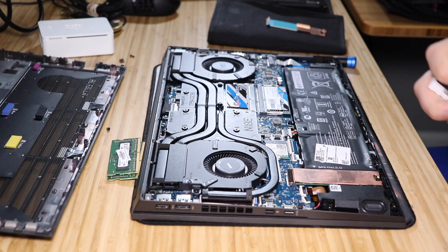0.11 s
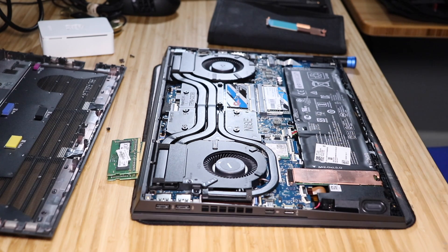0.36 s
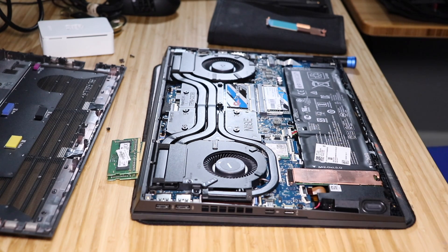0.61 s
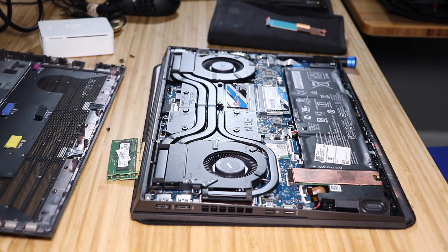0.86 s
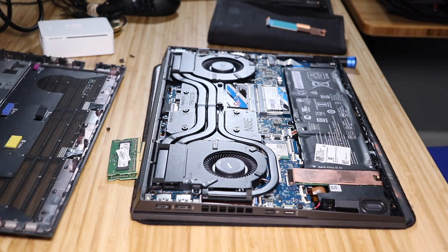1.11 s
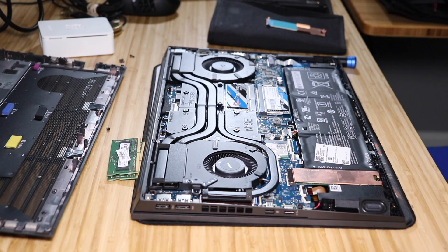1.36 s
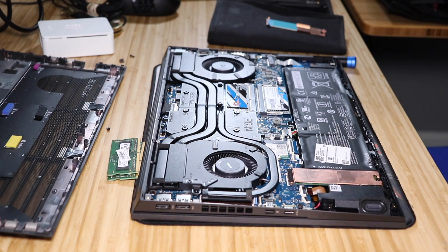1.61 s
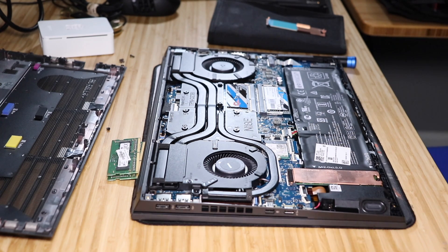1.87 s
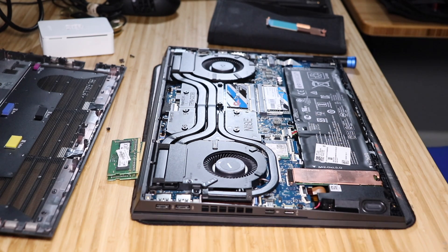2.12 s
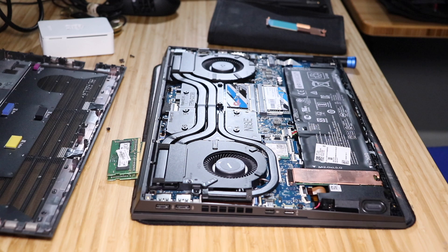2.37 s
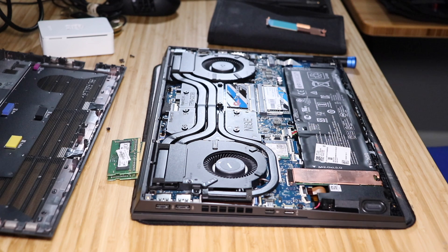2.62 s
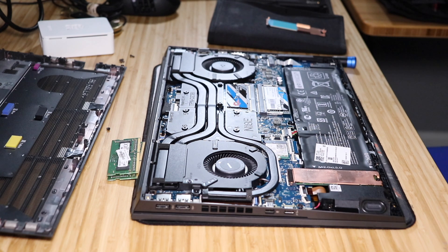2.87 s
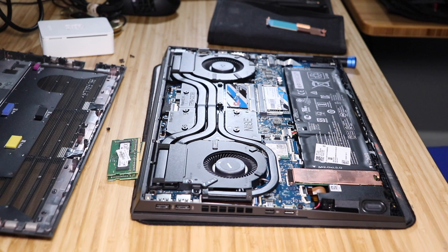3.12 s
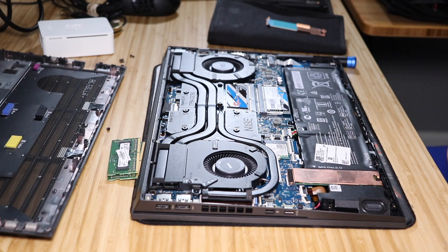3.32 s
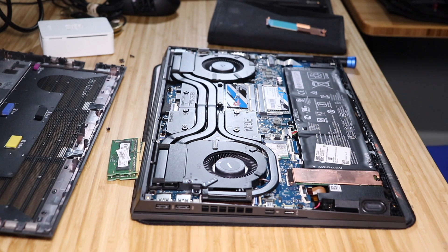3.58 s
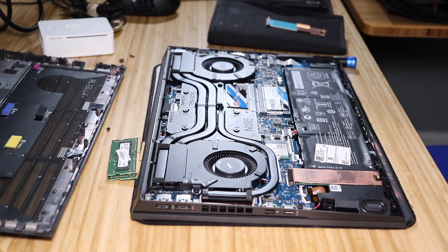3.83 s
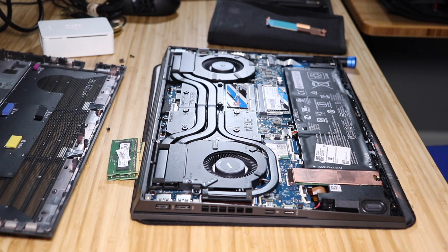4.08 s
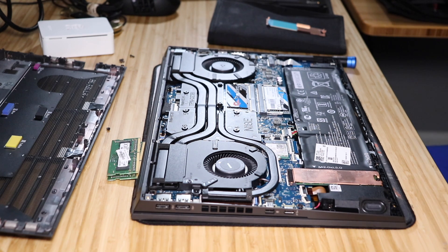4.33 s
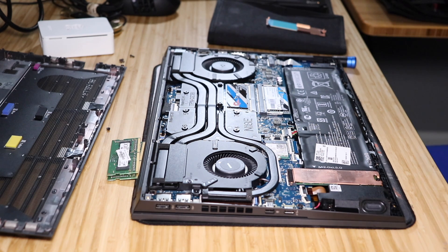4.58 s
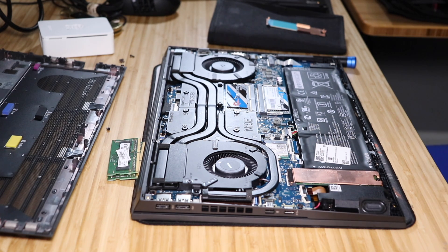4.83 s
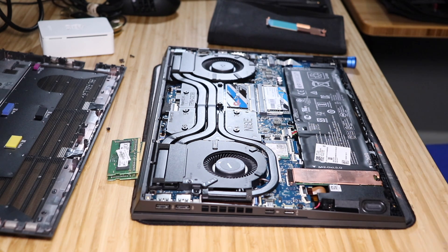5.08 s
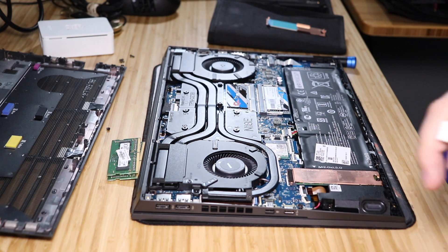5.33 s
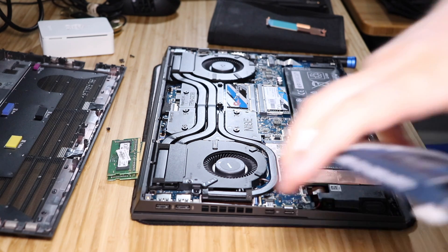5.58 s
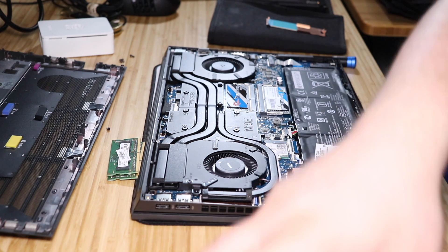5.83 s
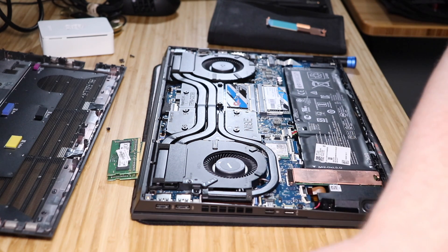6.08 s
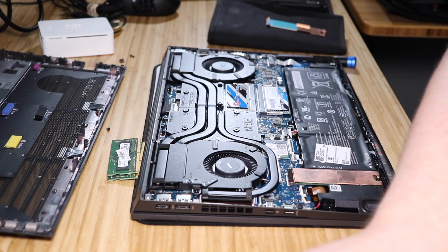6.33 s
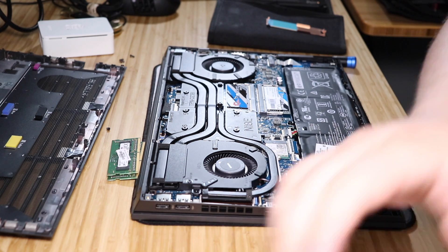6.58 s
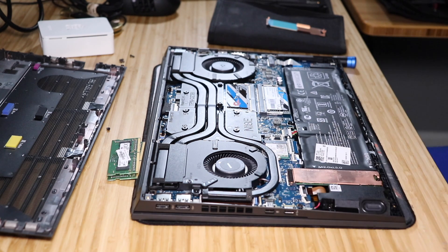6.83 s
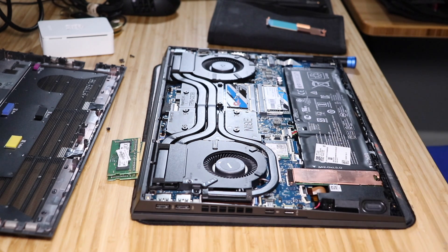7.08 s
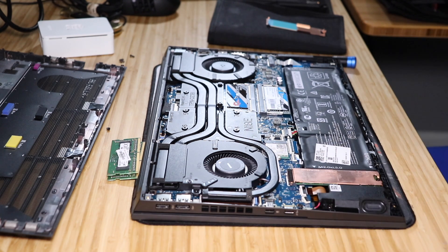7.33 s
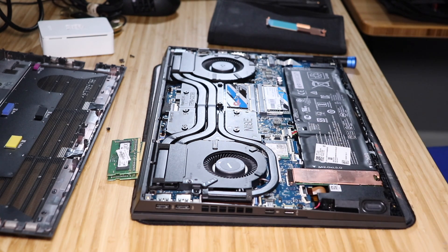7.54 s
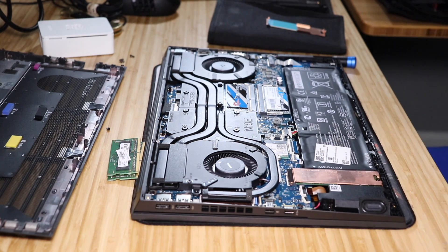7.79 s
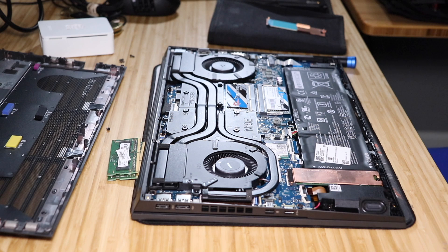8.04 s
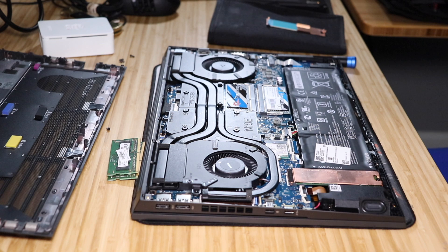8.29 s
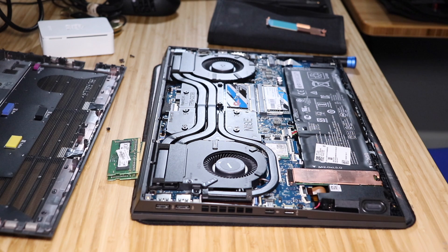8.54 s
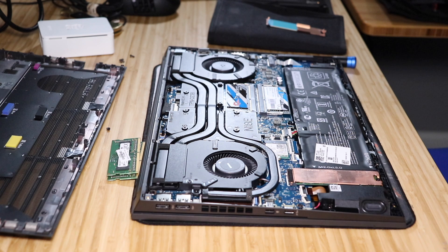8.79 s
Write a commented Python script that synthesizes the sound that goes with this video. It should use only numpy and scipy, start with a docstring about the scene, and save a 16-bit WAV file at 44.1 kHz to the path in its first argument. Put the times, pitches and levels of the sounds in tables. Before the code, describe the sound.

Stiff hollow plastic packaging rustles, crackles and snaps in someone's hands in a quiet room, with a few sharp loud cracks and short peels.

```python
"""In a quiet room, hands bend, tear and peel open a stiff hollow plastic pack over a wooden desk.
Fingers and film rustle: a swarm of tiny noise slips, coloured by the ringing hollow of the pack.
Creases snap in short ragged bursts that ring the crease, the hollow and the walls, and jolt the desk.
Small creases crackle at uneven gaps, and film comes off its glue in quick runs of slips.
A short room tail follows the pack, over steady air noise with a faint wavering hum."""
import sys
import numpy as np
from scipy import signal
from scipy.fft import rfft, irfft
from scipy.io import wavfile
from scipy.ndimage import uniform_filter1d

SR = 44100
rng = np.random.default_rng(int(sys.argv[2]) if len(sys.argv) > 2 else 0)


def waveform_to_disk(signal):
    """Save audio, clipped to [-1, 1], as 16-bit WAV at the path in sys.argv[1]."""
    frames = np.transpose(np.atleast_2d(signal))
    scaled = np.clip(frames, -1, 1) * 32767
    samples = np.round(scaled).astype(np.int16)
    wavfile.write(sys.argv[1], SR, samples)


def nominal_scale(level):
    """Amplitude ratio for a level in decibels (scalar or array-like)."""
    x = np.asarray(level, float) / 20
    return 10 ** x


N = 393372  # length in samples

# Squeezes, slides and pulls of the hands. Each row: time of the top in seconds, level in dB against the
# other moves, seconds to swell by 20 dB, seconds to fade by 20 dB (anything under 0.01 acts as 0.01).
MOVES = [(0, -58, .1, 0.38), (0.749, -66, 0.26, 0.7), (1.25, -62.5, 0.33, 0.23), (1.38, -66, -0.2, 1.9),
         (1.62, -66, 0.35, .15), (1.866, -56, 0.03, 0.13), (1.965, -62.5, -0.21, 0.7),
         (2.08, -52.5, -0.05, 0.35), (2.351, -51.5, -0.1, 0.19), (2.572, -61.5, .5, 0.13),
         (2.844, -63, 0.27, 0.14), (2.955, -64.5, -0.03, 0.32), (3.024, -53.5, -0.04, 0.11),
         (3.055, -52.5, -0.02, 0.07), (3.257, -60.5, -0.02, 0.12), (3.415, -60, -0.05, 0.1),
         (3.47, -61, 0.05, .2), (3.545, -49.5, -0.0149, 0.31), (3.8, -50.5, 0.08, 0.33),
         (4.005, -56.5, -0.2, 0.3), (4.205, -60.5, -0.66, .25), (4.385, -60, 0.1, 0.2),
         (4.529, -61, 0.05, 0.7), (4.72, -55, .03, 0.2), (4.795, -44.5, .083, 0.24),
         (4.94, -63, 0.05, 0.65), (5.095, -48.5, 0.14, 0.11), (5.173, -46.5, -0.03, 0.1148),
         (5.235, -50.5, -0.07, 0.16), (5.284, -49.5, 0.09, 0.04), (5.369, -47.5, -0.06, 0.05),
         (5.475, -50, 0.05, .07), (5.549, -57, -0.4, 0.03), (5.75, -54.5, 0.04, 0.26),
         (5.8, -58.5, 0.13, 0.03), (5.915, -53.5, .01, 0.33), (5.99, -50.5, 0.11, 0.1),
         (6.06, -61, 0.05, 0.19), (6.2, -57, 0.24, .1), (6.372, -65, .1, .07), (6.892, -62.5, 0.18, 0),
         (7.162, -70, 0.54, 1), (7.54, -65.5, .83, 0.6), (8.235, -67.5, 0.4, 0.9), (8.745, -49, -0.02, 0.3),
         (8.804, -41.5, 0.01, 0.04)]
# The part in the hands, thick shell or thin film. Each row: time in seconds, boom in dB, edge in dB,
# both as starting points that the rustle and the crackle shift further.
GRIP = [(0, -1, -18.5), (.55, -8, -7), (.9, 4, -9.5), (1.3, 2, -6), (2.1, -0.5, -10.5), (2.4, 1.5, -8.5),
        (2.9, 6.5, 0.5), (3.25, 3.5, -9.5), (3.5, 3, -15), (4, -2, -5), (4.8, 1.5, -8), (5.1, -12.5, -11.5),
        (5.45, -6.5, -13), (5.8, -2, -9.5), (6.4, 0.5, -12), (6.9, -4, -9.5), (7.5, -10, -6),
        (8.3, -9, -1.5), (8.92, -8, -4)]
# The hollow as the grip changes it. Each row: time in seconds, base pitch of the first air resonance in Hz,
# base pitch of the second in Hz, extra strength of the resonances in dB.
HOLLOW = [(0, 885, 2150, 0), (.55, 960, 2920, -3), (.74, 930, 2500, -1), (1.701, 920, 2640, 3),
          (2.1, 980, 3060, -1.5), (2.25, 1111, 3360, -7), (2.701, 1040, 2700, -1.5),
          (3.04, 800, 2760, -0.5), (3.2, 980, 2780, -4.5), (3.45, 1027, 3850, 4), (3.75, 1090, 3720, -1.5),
          (4.2, 1070, 2985, -4.5), (5.2, 1177, 3050, -3.5), (6.3, 943, 2864, -5.5), (7.2, 1096, 3447, -10),
          (8.92, 1098, 3290, -4)]
# Resonances of the hollow. Each row: share of the first base pitch, share of the second (both plain
# numbers), width in Hz, level in dB before the extra strength.
HOLLOW_MODES = [(1.05, 0, 190, 7), (0.98, 1, 220, -3), (0.037, 1, 370, 3), (0, 1.95, 700, 1),
                (0.049, 2.5, 1800, -2.5)]
# How the room tail dies away. Each row: pitch in Hz, seconds to fall by 60 dB.
ROOM_DECAY = [(200, 0.27), (600, 0.27), (1500, 0.31), (4000, 0.39), (10000, 0.21)]
# Colour of the room tail against the direct sound. Each row: pitch in Hz, gain in dB.
ROOM_COLOUR = [(1300, -0.5), (1900, 2.5), (2800, -2), (4000, -2), (7000, 1.5)]
# Colour of the air noise. Each row: pitch in Hz, relative level in dB per Hz.
AIR_COLOUR = [(24, -36), (40, -11), (127, 0.5), (438, -6), (640, -7.5), (1110, -13.5), (2100, -17),
              (2760, -20.5), (4920, -27.5), (11900, -31), (16500, -54)]
# Faint hum tones. Each row: pitch in Hz, level in dB before a shared cut of 1 dB.
HUM = [(118.4, -82.5), (150.7, -80)]
# Creases and seams that give way. Each row: time in seconds, peak of the dry crack in dB, boom of the shell
# in dB, edge of the crack in dB, ring of the crease in Hz.
SNAPS = [(0.1443, -46, -8, -11, 3440), (0.235, -44, 2, -15, 3600), (0.2924, -40, 0, -9, 2780),
         (0.3873, -43, 4, -4.5, 3920), (0.514, -43, -10, -8, 4800), (0.5232, -24.5, 3.5, -2, 2960),
         (0.586, -44.5, 31, -14, 1500), (0.7394, -44, 27, -14, 2930), (0.98, -39.5, -1, -10, 2490),
         (1.027, -38.5, 7, -15, 2500), (1.06, -41.5, -4, -9, 2710), (1.099, -42, 11, -1, 3140),
         (1.124, -43, -4, -7, 2560), (1.171, -43.5, -8, -10, 2580), (1.198, -44, 3, -9, 2330),
         (1.304, -43, 3, -8, 2690), (1.365, -38, 6.5, -2, 2630), (1.373, -39.5, 12, -20, 2450),
         (1.4123, -41.5, -1, 0, 2590), (1.602, -35, 5.5, -2.5, 7040), (1.6308, -35.5, -0.5, -3, 4780),
         (1.7621, -36, 0.5, -6.5, 2970), (1.8582, -34.5, -6, -11.5, 3190), (1.935, -40, 2, -27, 1500),
         (2.0154, -35, 11, -9.5, 1490), (2.069, -32, 10.5, 2.5, 6700), (2.152, -34.5, -9, -1.5, 3300),
         (2.192, -30, -2.5, -11.5, 5150), (2.2013, -32, -0.5, -18, 2820), (2.2403, -27, 11, 5.5, 1510),
         (2.2524, -9.5, 11.5, -10, 1740), (2.2535, -2.5, 5.5, -0.5, 3500), (2.4337, -29.5, 2, -0.5, 5900),
         (2.5765, -39, 5, -17, 2660), (2.6282, -39, -6, -5, 2800), (2.6813, -40.5, 3.5, -7.5, 2600),
         (2.828, -39.5, 5, -5, 2900), (2.851, -41, 17.5, -1, 2896), (2.884, -41.5, 0, 1, 2020),
         (2.9026, -38.5, -2, -4.5, 4500), (2.949, -37.5, 14, 0, 2900), (3.023, -35.5, 20, -2, 2900),
         (3.044, -34, 20, -21, 2900), (3.059, -27.5, 6.5, -35, 2850), (3.149, -46.5, 0, -6, 2840),
         (3.201, -47, 7, -6, 3940), (3.239, -44, 6, -6, 4030), (3.256, -44.5, 10, -9, 3980),
         (3.416, -40, 11.5, -9.5, 3840), (3.445, -47, 3, -8, 1710), (3.467, -34.5, 0.5, -20, 4030),
         (3.5626, -8, -6, -13.5, 3870), (3.5662, -9.5, -1.5, -13, 3780), (3.662, -46.5, 7, -15, 3900),
         (3.719, -34.5, 3, -12, 4000), (3.75, -40, 6, -5, 3800), (3.8163, -12, 8.5, -6, 2190),
         (3.838, -28, -5, -6, 7500), (4.002, -32.5, -0.5, -9, 3840), (4.3852, -39.5, 2, -10, 2950),
         (4.6283, -35, 5.5, -10, 3110), (4.7869, -24, 8.5, -12, 1290), (4.7931, -29, 13, -19, 2800),
         (4.994, -39.5, -7, -5.5, 4480), (5.114, -37.5, 1, -10, 3000), (5.172, -39, 5, -18, 3200),
         (5.233, -40, -4, -10, 2900), (5.293, -38.5, -10, -6.5, 3500), (5.362, -39.5, 6, -11, 3500),
         (5.4252, -40, 31, -19, 1508), (5.46, -33.5, -13, -2.5, 7800), (5.476, -39.5, -12, -7, 5000),
         (5.4921, -36, 6.5, -17, 2720), (5.55, -37.5, 10, -13, 3150), (5.6647, -44.5, -8, -8, 3350),
         (5.746, -40, 3, -9, 4300), (5.789, -34, -1, -23.5, 2690), (5.874, -42, 7, -11, 4600),
         (5.911, -43, 21, -10, 2500), (5.9897, -31, 2.5, -16.5, 3000), (6.01, -37, 11, -16, 2500),
         (6.059, -42, 15.5, -17, 3100), (6.288, -44, -3, -7, 3000), (6.3637, -44, 6.5, -16, 1554),
         (6.628, -48.5, -5, -7.5, 3000), (6.8882, -40.5, -9, -16.5, 2455), (6.896, -36.5, 3, -10, 2250),
         (6.922, -39.5, -5.5, -4, 5240), (7.2333, -41.5, -17, -7.5, 4950), (7.2756, -36.5, -3, -5, 3900),
         (7.3661, -44, -12.5, -8.5, 3365), (7.3918, -43, -17, -7.5, 3400), (7.405, -33.5, -16, -12, 3410),
         (7.566, -36.5, -6, -4, 6930), (7.5846, -38, -14, -7, 3500), (7.609, -34.5, -20, -9.5, 3540),
         (7.6568, -39, -4.5, 1.5, 7900), (7.67, -35.5, -6, -10, 6420), (7.776, -46, -2.5, -3.5, 7100),
         (7.8078, -46, -6, 0.5, 4970), (7.8612, -45, -7, -6.5, 3090), (7.908, -41.5, -8, -4.5, 3060),
         (7.978, -40.5, -9.5, 1, 3250), (7.9975, -40, -4, -0.5, 3240), (8.0224, -38, 6, -4, 3230),
         (8.0512, -36, 1, -2.5, 1510), (8.093, -43, -13, -2, 5800), (8.1049, -41, 4, 2, 8350),
         (8.161, -44.5, -8, -2, 5000), (8.181, -40, -8, -2, 5860), (8.1992, -39.5, -7.5, -3, 6000),
         (8.308, -40.5, -13, 4, 6600), (8.3527, -35, -16, 1, 6120), (8.383, -36, -4, 0.5, 6700),
         (8.5052, -29.5, -8, -5.5, 3390), (8.558, -39, -9, -8.5, 3880), (8.6404, -32.5, -6.5, -10.5, 3660),
         (8.652, -33, -6, -6, 6830), (8.6694, -31, -6.5, -5, 6260), (8.6912, -32, 0, -5, 6940),
         (8.716, -30.5, -7, -9, 3640), (8.732, -32.5, -8, -9, 3450), (8.847, -30, -2, -6, 3480),
         (8.865, -28, -7, -6, 3340), (8.9085, -32, -2.5, -5.5, 3720)]
# Bending modes of the walls, rung by hard blows. Each row: pitch in Hz, width in Hz, level in dB for
# a crack that peaks at 0 dB.
WALL_MODES = [(370, 300, -2), (800, 360, -5), (1090, 260, 2.5), (1740, 260, 5), (2300, 160, -0.5)]
# Spells of small creases. Each row: start in seconds, length in seconds, ticks per second,
# middle peak level in dB.
CRACKLE = [(1.448, .14, 38, -44.5), (1.792, .2, 50, -43.5), (2.029, .15, 70, -44), (2.438, .16, 61, -41.5),
           (3.404, .14, 48.6, -43), (4.189, .06, 55, -44), (4.602, .12, 48, -47), (4.849, .12, 60, -43.5),
           (6.838, .12, 51, -49), (7.28, .37, 40, -45.5), (7.71, .14, 35, -50), (8.578, .06, 70, -44.5)]
# Film coming off its glue. Each row: start in seconds, length in seconds, top slips per second,
# middle peak level in dB at that top.
PEELS = [(1.849, .055, 170, -40), (1.95, .025, 200, -44), (7.447, .109, 160, -37),
         (8.212, .045, 290, -46.5), (8.26, .085, 120, -48), (8.432, .07, 110, -48.5),
         (8.736, .162, 230, -37.5)]

BOOM_HZ, BODY_HZ, EDGE_HZ = 1000, 3200, 9500  # corners between low, middle and high sound


def evened(x):
    """Scales a signal to an rms of one."""
    return x / np.sqrt(np.mean(x ** 2) + 1e-20)


def read(points, hz):
    """Reads a curve of (Hz, value) points along a logarithmic pitch axis."""
    f, value = np.transpose(points)
    return np.interp(np.log(hz + 1), np.log(f + 1), value)


def add(mix, s, sound):
    """Adds a sound to the mix at s seconds."""
    part = mix[round(s * SR):][:len(sound)]
    part += sound[:len(part)]


def shell(hz, t, shift=1):
    """Gain of the pack at time t: the bare crack plus the ringing hollow, summed as powers."""
    s, first, second, strength_db = np.transpose(HOLLOW)
    power = nominal_scale(-5.5) ** 2  # the bare crack
    for a, b, width_hz, db in HOLLOW_MODES:
        centre_hz = shift ** b * np.interp(t, s, a * first + b * second)
        off = 2 * (hz - centre_hz) / width_hz
        mode_gain = nominal_scale(db + np.interp(t, s, strength_db))
        power = power + mode_gain ** 2 / (1 + off ** 2) ** 1.17
    no_bass = 1 + (240 / (hz + 1)) ** 3  # small things radiate no bass
    no_top = 1 + (hz / 14300) ** 8
    return np.sqrt(power) / no_bass / no_top


def tilt(hz, boom_db, edge_db):
    """Gain that bends the spectrum below and above the body band."""
    octave = np.log2(hz + 1)
    low = np.clip((np.log2(BODY_HZ) - octave) / np.log2(BODY_HZ / BOOM_HZ), 0, 1)
    high = np.clip((octave - np.log2(BODY_HZ)) / np.log2(EDGE_HZ / BODY_HZ), 0, 1.5)
    return nominal_scale(low * boom_db + high * edge_db)


def grip(t):
    """Boom and edge of the part that is in the hands at time t."""
    s, boom_db, edge_db = np.transpose(GRIP)
    return np.interp(t, s, boom_db), np.interp(t, s, edge_db)


def hands(t):
    """Gain of the handling: every move swells to its top and fades, and their powers add."""
    top, db, swell, fade = np.transpose(MOVES)[:, :, None]
    before = (top - t) / np.maximum(swell, .01)
    after = (t - top) / np.maximum(fade, .01)
    away = np.maximum(before, after)
    move_gain = nominal_scale(db - 20 * away ** 1.2)  # a power above 1 rounds the top
    return np.sqrt((move_gain ** 2).sum(0))


def rustle():
    """A swarm of tiny slips, in clumps, over a smooth rub; the hands set level and colour."""
    clumps = nominal_scale(2.0 * evened(uniform_filter1d(rng.standard_normal(N), 350)))
    sizes = nominal_scale(2.3 * np.minimum(rng.exponential(1, N), 2.5))
    slips = sizes * (rng.random(N) < 350 / SR)  # about 350 slips per second
    fading = np.exp(-np.arange(200) / 36.0)
    slips = signal.oaconvolve(slips, fading)[:N] * rng.standard_normal(N)
    rub = nominal_scale(0.87) * rng.standard_normal(N)
    drive = evened(slips) + rub
    hz, t, z = signal.stft(evened(drive * clumps), SR, nperseg=512, noverlap=448)
    boom_db, edge_db = grip(t)
    # the upper resonances wander at random under the fingers
    shift = 1 + 0.038 * evened(uniform_filter1d(rng.standard_normal(len(t)), size=30))
    colour = shell(hz[:, None], t, shift) * tilt(hz[:, None], boom_db + 3.0, edge_db - 2)
    patches = rng.standard_normal(z.shape[::-1]).T
    patches = uniform_filter1d(uniform_filter1d(patches, 12, 0), 40, 1)
    colour *= nominal_scale(2.3 * evened(patches))  # every fold has its own colour
    z = z * colour * hands(t) * nominal_scale(9)
    return signal.istft(z, SR, nperseg=512, noverlap=448)[1][:N]


def room(x):
    """Near surfaces answer soon, then three echo patterns fade and take turns at a steady pace."""
    taps = np.zeros((3, SR // 2))
    at = np.arange(120, SR // 2 - 10, 10) + rng.integers(0, 10, (3, SR // 20 - 13))
    np.put_along_axis(taps, at, rng.choice([-1., 1.], at.shape), 1)
    hz, t, z = signal.stft(taps, SR, nperseg=256)
    hz = hz[:, None]
    early = 1 + nominal_scale(6 - 60 * t / 0.037)
    # the treble beams forward, so less of it reaches the walls
    beam = np.sqrt(1 + (hz / 2500) ** 2 / (1 + (hz / 5500) ** 2))
    decay = nominal_scale(read(ROOM_COLOUR, hz) - 60 * t / read(ROOM_DECAY, hz))
    tails = signal.istft(z * early / beam * decay, SR, nperseg=256)[1]
    # each pattern swings up, down and over in sign, while the total power stays even
    turns = np.arange(N) / SR / .11 + np.arange(3)[:, None] / 3
    place = np.cos(np.pi * turns) * np.sqrt(2 / 3)
    echoes = signal.oaconvolve(x * place, tails, axes=1)[:, :N].sum(0)
    return x + nominal_scale(-12.0) / np.linalg.norm(tails[0]) * echoes


def air():
    """Steady room noise, shaped in pitch, with faint hum tones whose phase wavers at random."""
    hz, t = np.fft.rfftfreq(N, 1 / SR), np.arange(N) / SR
    shaped = irfft(rfft(rng.standard_normal(N)) * nominal_scale(read(AIR_COLOUR, hz)), N)
    hush = nominal_scale(-68.5) * evened(shaped)
    drift = uniform_filter1d(rng.standard_normal((len(HUM), N)), 2000, 1)
    waver = np.cumsum(drift, 1) * 0.017  # radians
    hum = sum(nominal_scale(db - 1.0) * np.sin(2 * np.pi * f * t + w) for (f, db), w in zip(HUM, waver))
    return hush + hum


def causal(gain):
    """Gives a gain the phase of a real resonator, so that nothing sounds before the blow."""
    circle = np.log(np.r_[gain, gain[-2:0:-1]] + 1e-5)
    return gain * np.exp(-1j * signal.hilbert(circle).imag[:len(gain)])


def cracks(rows):
    """Each crease lets go in a short ragged burst that rings itself and the pack; boomy ones last longer."""
    out, t, hz = np.zeros(N), np.arange(1024) / SR, np.fft.rfftfreq(1024, 1 / SR)
    noise = rng.standard_normal((len(rows), 1024))
    bumps = uniform_filter1d(uniform_filter1d(noise[:, :len(hz)], size=12), size=12)
    # the flat faces beside each crease colour the lighter cracks
    facets = nominal_scale(3.5 * evened(bumps) * hz / (hz + BOOM_HZ))
    fade_out = np.cos(t / t[-1] * np.pi / 2)
    for (s, peak_db, boom_db, edge_db, ring_hz), ragged, face in zip(rows, noise, facets):
        u = t / (0.0018 * nominal_scale(.3 * boom_db))
        burst = rfft(ragged * u ** 1.44 * np.exp(-3 * u))
        burst /= np.sqrt(uniform_filter1d(abs(burst) ** 2, 13)) ** 0.65  # the burst has little colour
        crease = nominal_scale(3.5) / (1 + (2 * (hz - ring_hz) / 750) ** 2)
        walls = sum(nominal_scale(db + 0.45 * peak_db) / (1 + (2 * (hz - f) / width_hz) ** 2)
                    for f, width_hz, db in WALL_MODES)
        walls = walls / (1 + (230 / (hz + 1)) ** 4)  # no deep bass from the walls
        hollow = shell(hz, s) * face ** min(-peak_db / 20, 1)
        gain = np.hypot(hollow, crease + walls) * tilt(hz, boom_db, edge_db)
        sound = irfft(burst * causal(gain))
        add(out, s - .0005, nominal_scale(peak_db) * fade_out * sound / abs(sound).max())
    return out


def thumps():
    """Every snap jolts hands and desk with one short low push; only the hard ones are felt."""
    out, u = np.zeros(N), np.arange(2048) / SR / .003  # time in steps of 3 ms
    push = u * (2 - u) * np.exp(-u)
    for s, peak_db, *_ in SNAPS:
        add(out, s, nominal_scale(-32.5 + 0.96 * peak_db) * push)
    return out


def crackle(start, length, per_s, peak_db):
    """Small creases give way at uneven gaps, each with its own size, colour and ring."""
    when = start + np.cumsum(rng.uniform(.25, 1.75, 64)) / per_s
    a, b, c, d = rng.standard_normal((64, 4)).T
    boom_db, edge_db = grip(when)
    ring_hz = 4300 * 2 ** (.5 * d)  # spread by half an octave
    rows = np.c_[when, peak_db + 3 * a, boom_db + 4.5 * b, edge_db + 4.5 * c, ring_hz]
    return rows[when < start + length]


def peel(start, length, top_per_s, top_db):
    """Stick and slip of the glue line: near regular slips that speed up, slow down and vary in size and ring."""
    t = np.arange(0, length, 1 / SR)
    arch = np.sin(np.pi * t / length)
    per_s = top_per_s * (.58 + (1 - .58) * arch)  # 0.58 of the top speed at both ends
    at = np.diff(np.floor(np.cumsum(per_s) / SR), prepend=-1) > 0
    a, b, c = rng.standard_normal((64, 3))[:at.sum()].T
    when = start + t[at] + .12 * a / per_s[at]
    peak_db = top_db - 6 * (1 - arch[at]) + 2.5 * b  # 6 dB softer at both ends
    boom_db, edge_db = -11 + 0 * a, -5 + 2.5 * c
    ring_hz = 3450 * (1 + .8 * (c > .2))  # the brighter slips ring higher
    return np.c_[when, peak_db, boom_db, edge_db, ring_hz]


def scene():
    """The pack's sounds in the room, with the jolts of the desk and the air of the room."""
    ticks = [crackle(*row) for row in CRACKLE]
    slips = [peel(*row) for row in PEELS]
    pack = rustle() + cracks(SNAPS) + cracks(np.vstack(ticks + slips))
    light = signal.butter(2, 95, "high", fs=SR, output="sos")  # light things cannot push deep bass
    handled = signal.sosfilt(light, room(pack) + thumps())
    return (handled + air())[None]


def band_limit(x):
    """A steep low-pass at the top of the band."""
    return signal.sosfilt(signal.butter(12, 17150, fs=SR, output="sos"), x)


def record(dry):
    """A steep filter cuts the top of the band, 50 dB down from 16900 Hz."""
    low_pass = signal.cheby2(10, 50, 16900, fs=SR, output="sos")
    mix = signal.sosfilt(low_pass, dry)
    return band_limit(mix)


dry = scene()
out = record(dry)
waveform_to_disk(out)
```